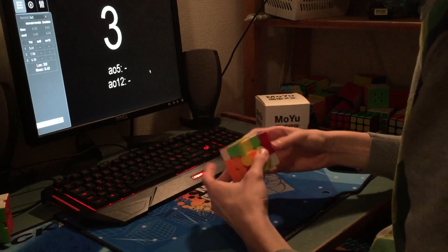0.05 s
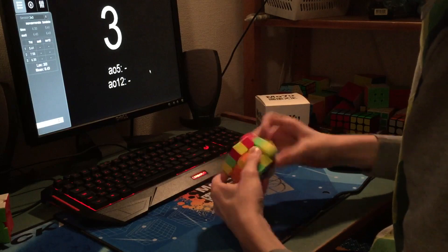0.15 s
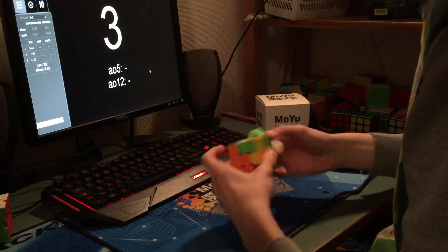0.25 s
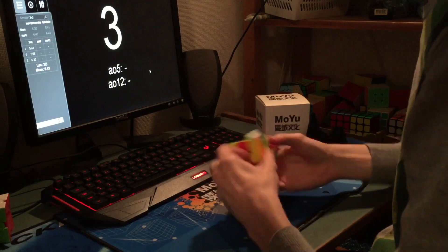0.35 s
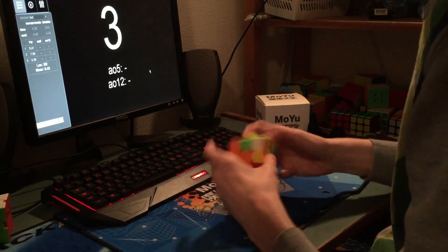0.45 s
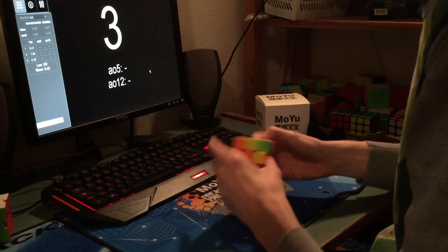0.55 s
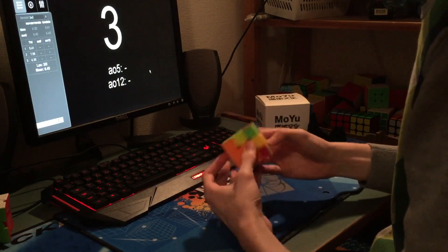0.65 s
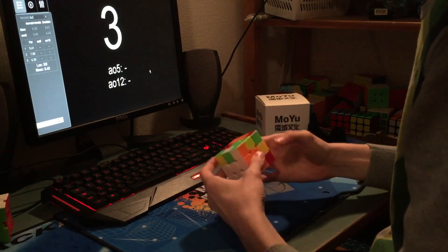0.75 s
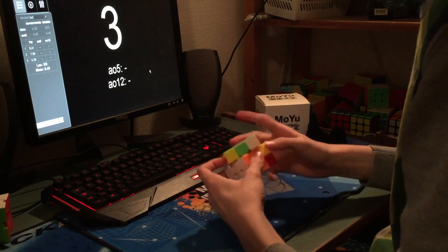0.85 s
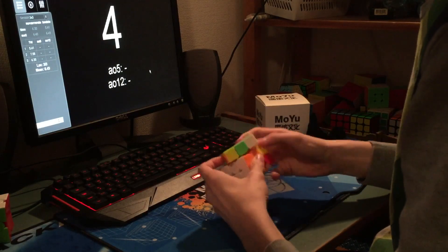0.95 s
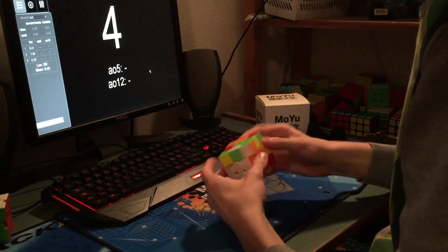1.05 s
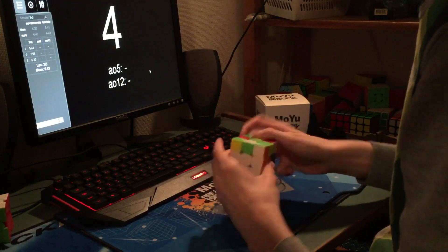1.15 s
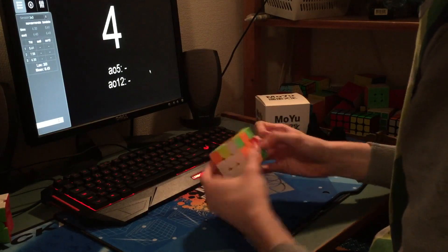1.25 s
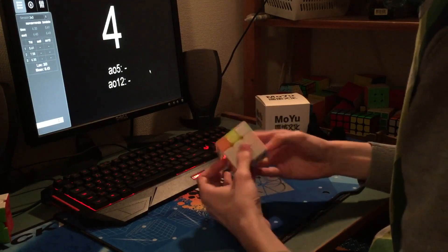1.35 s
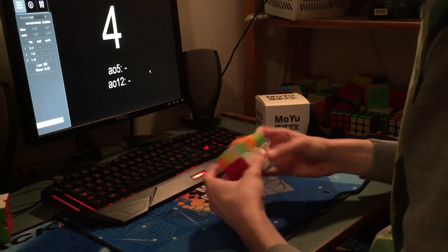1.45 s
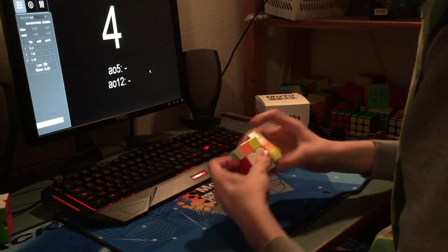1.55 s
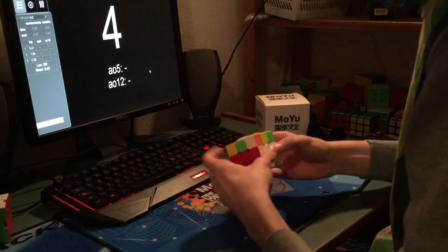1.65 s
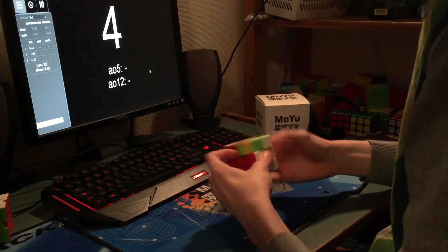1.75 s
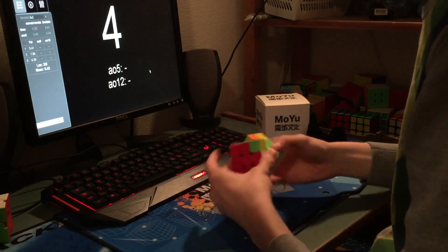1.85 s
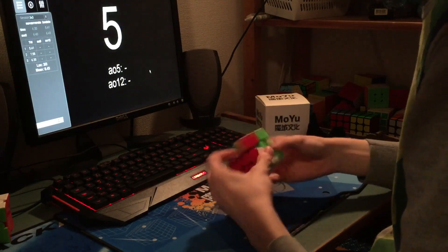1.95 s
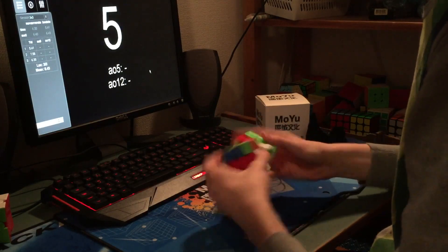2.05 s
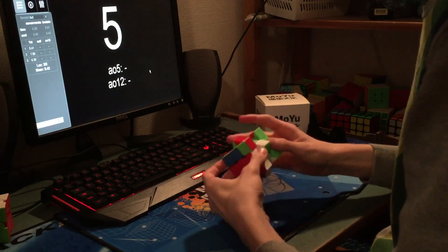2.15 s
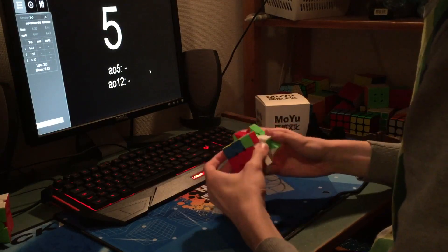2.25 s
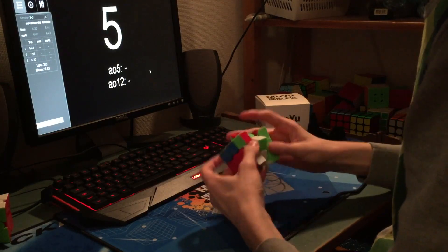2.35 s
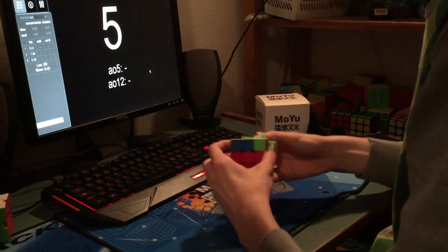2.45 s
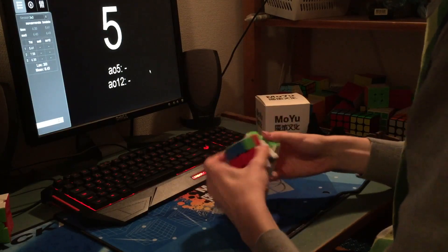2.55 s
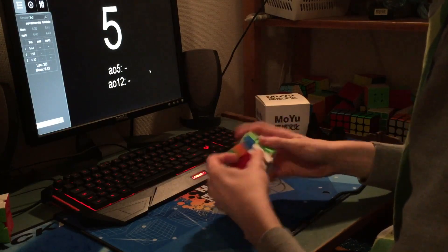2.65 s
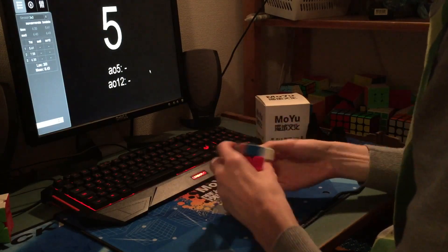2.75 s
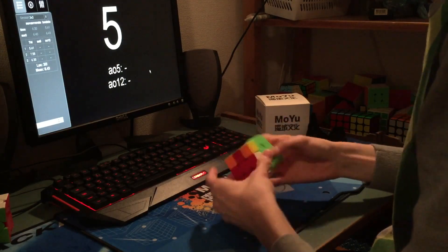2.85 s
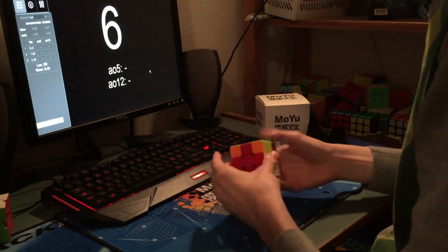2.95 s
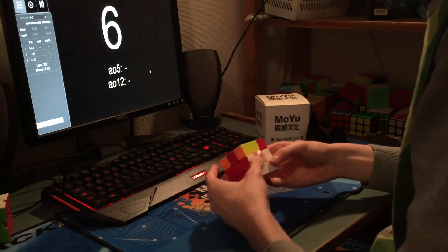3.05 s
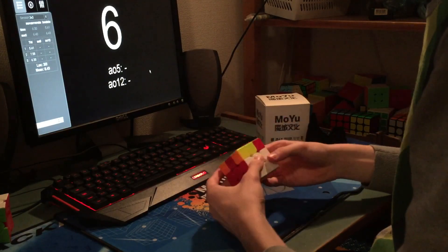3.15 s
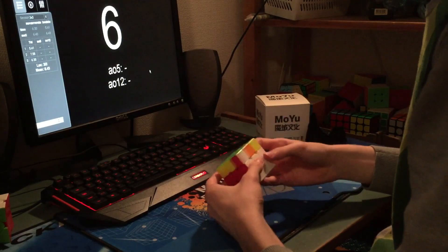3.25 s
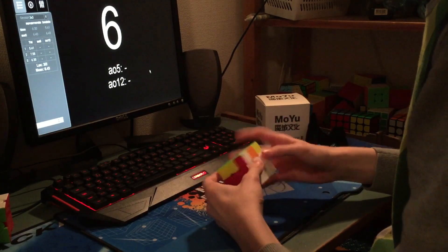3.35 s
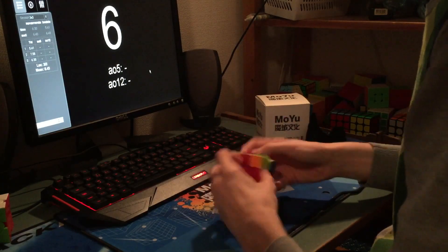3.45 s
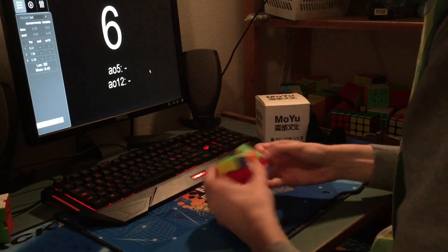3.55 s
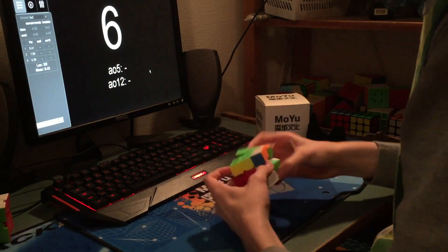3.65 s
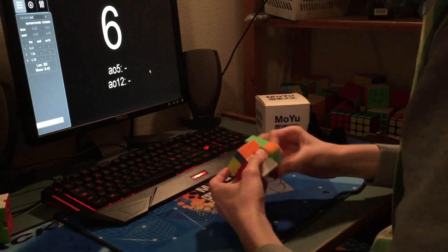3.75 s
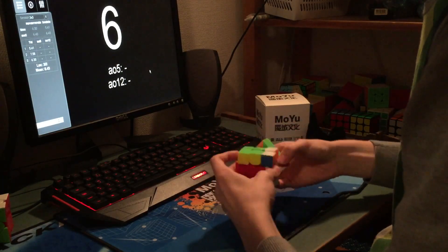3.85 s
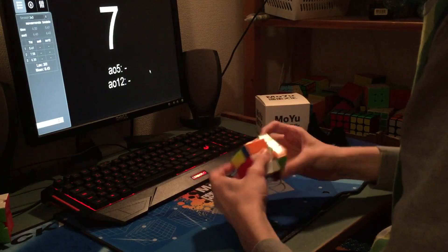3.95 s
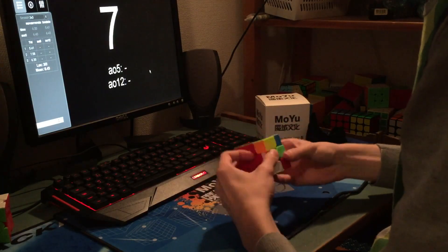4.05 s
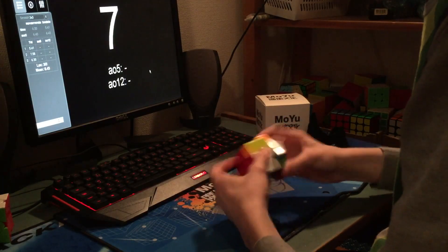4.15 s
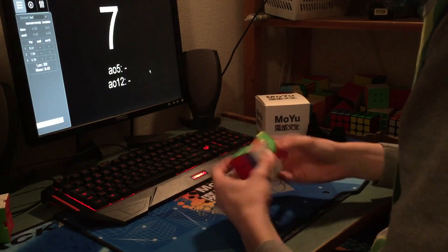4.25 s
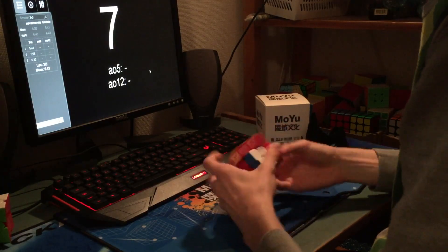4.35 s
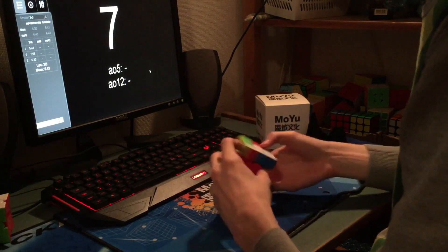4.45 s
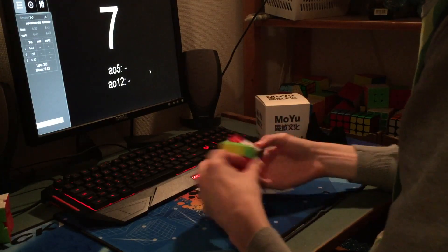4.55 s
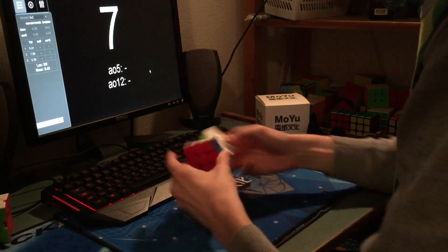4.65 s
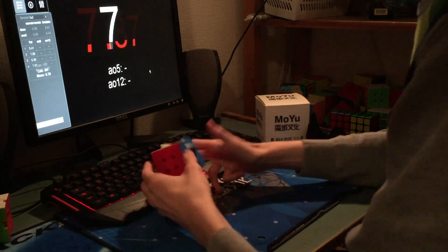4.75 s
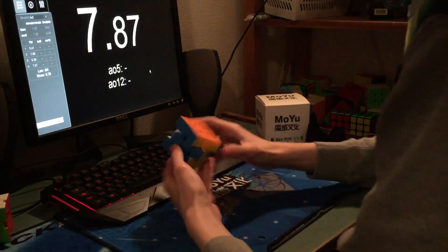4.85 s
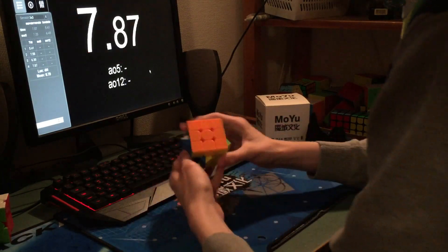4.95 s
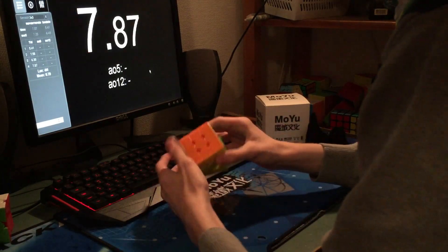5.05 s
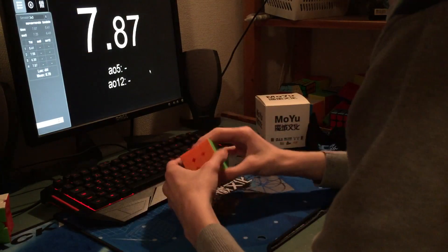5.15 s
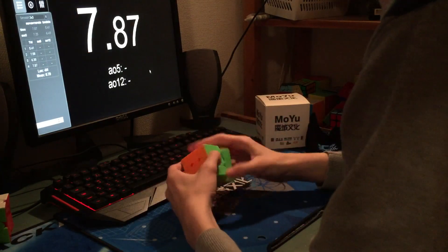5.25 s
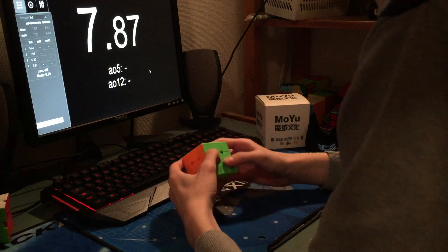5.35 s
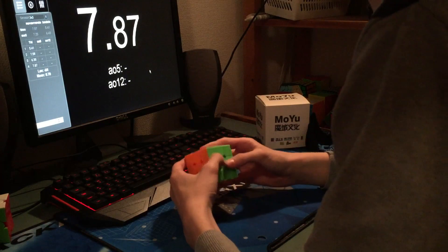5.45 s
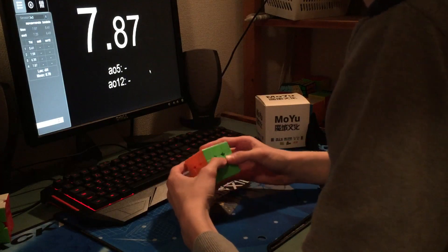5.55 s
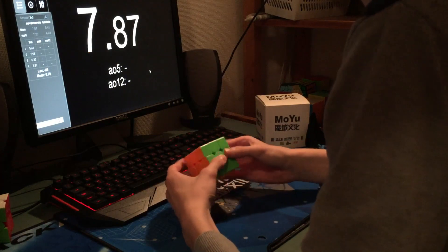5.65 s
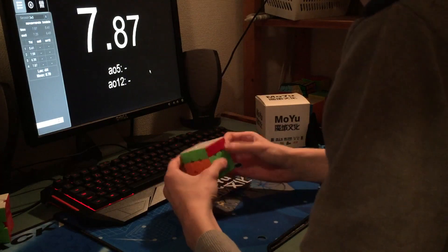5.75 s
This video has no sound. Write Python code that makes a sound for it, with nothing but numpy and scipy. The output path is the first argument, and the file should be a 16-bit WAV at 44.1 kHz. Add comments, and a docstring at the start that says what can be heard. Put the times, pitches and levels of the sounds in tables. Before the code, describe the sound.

Rapid plastic clicking and clacking of a puzzle cube being turned, ending in a key slap and low thud over faint hum.

```python
"""Sharp plastic clicks and a fine rattle: hands spin a puzzle cube above a desk. Its layers slide by
stick-slip friction and snap home, and each impact rings the damped modes of the pieces and hollow body.
Then a hand slaps the space bar: the key knocks and the desk booms in its low modes.
A computer fan hums over a steady hiss, and the small room adds short echoes to the impacts."""
import sys
import numpy as np
from scipy import signal
from scipy.fft import rfft, irfft
from scipy.io import wavfile

SR = 44100
rng = np.random.default_rng(int(sys.argv[2]) if len(sys.argv) > 2 else 0)


def generate_wav(signal):
    """Clip the signal to [-1, 1] and save it as 16-bit WAV at the path in sys.argv[1]."""
    frames = np.transpose(np.atleast_2d(signal))
    scaled = np.clip(frames, -1, 1) * 32767
    pcm = np.round(scaled).astype(np.int16)
    wavfile.write(sys.argv[1], SR, pcm)


N = 255780

# pieces snapping against each other: (time [s], level [dB], hollow body over bright pieces [dB])
SNAPS = [(0.0046, -15.5, 0), (0.092, -32.5, -13), (0.1155, -35, -3), (0.2023, -38.5, 13.5),
         (0.2088, -21.5, -3), (0.2266, -11, -9), (0.2598, -31, -4.5), (0.2906, -14.5, -6),
         (0.3028, -17.5, -1), (0.354, -21.5, -8), (0.365, -33.5, 4), (0.3806, -29, -24.5),
         (0.4042, -33.5, 8), (0.4536, -25.5, 6), (0.4634, -14, -2.5), (0.494, -26, -0.8),
         (0.504, -11.5, 2.5), (0.5327, -14.5, 2), (0.5556, -7.5, -21.5), (0.6425, -23, 2.6),
         (0.6833, -24.5, 2.5), (0.6901, -25, -0.5), (0.8093, -52, -7), (0.8475, -43.5, -30),
         (0.9005, -52, -18), (0.9573, -35.5, 0), (0.979, -33, -2), (1.0423, -32, -16), (1.0872, -28, -5),
         (1.1033, -20, 0), (1.2032, -38, -11), (1.2188, -35, 6.5), (1.2501, -35, 10), (1.2598, -30, -4),
         (1.3315, -32.5, 6), (1.3379, -16.5, -3.5), (1.3503, -22.5, 0.5), (1.3597, -15.5, -3),
         (1.383, -8.5, -4.2), (1.492, -37, -20.5), (1.5612, -25.5, 5), (1.579, -10.5, -13),
         (1.5856, -21.5, 4.5), (1.6589, -14, 0), (1.6679, -9.5, -7), (1.704, -12, -18),
         (1.7532, -19.5, -29), (1.8156, -31, -12), (1.8458, -32.5, 7.5), (1.8594, -21, -1),
         (1.8674, -16, -3.5), (1.8908, -29, -18), (1.945, -31.5, -9), (2.0059, -22, 3.5), (2.0316, -22, -2),
         (2.067, -24, 3.5), (2.096, -11, -1), (2.1015, -16, -31), (2.3105, -44.5, 9.5), (2.3229, -32, 2.5),
         (2.3375, -36, -19), (2.3672, -49, -16), (2.4156, -37, -15), (2.4228, -32, 4.5), (2.4443, -29, 0),
         (2.4524, -28.5, 4.5), (2.515, -34, 5.5), (2.5234, -33, -11), (2.534, -26.5, 0), (2.5535, -25.5, 3),
         (2.6548, -33.5, 3.5), (2.6793, -36, -4), (2.693, -31, -1), (2.742, -10.5, -7.5),
         (2.7565, -12.5, -0.5), (2.7967, -26, 8.5), (2.8672, -22, -1.5), (2.9002, -21.5, 6),
         (2.912, -19.5, -3), (2.9638, -5.5, -12), (2.9896, -9.5, -16.5), (3.0324, -22.5, -0.7),
         (3.11, -41.5, -13), (3.1986, -50, -3), (3.2484, -56, -12), (3.349, -46, 6), (3.3573, -33.5, 1.5),
         (3.3713, -31.5, 5), (3.4768, -41, 2.5), (3.489, -35.5, 5.5), (3.499, -18.5, 0), (3.506, -13, -4.5),
         (3.5296, -12, -5), (3.5923, -28, 0), (3.6493, -36, 8.5), (3.6584, -35.5, 6), (3.694, -16.5, -0.1),
         (3.7073, -11.5, -10), (3.7288, -25.5, 5.5), (3.758, -22.5, -18.5), (3.7962, -28, -5.5),
         (3.8187, -18, -7.5), (3.8267, -21, -8), (3.8418, -9.5, 2), (3.887, -29.5, 1), (3.9151, -9, -6.5),
         (3.9928, -30, 1), (4.0134, -29.5, -21), (4.0257, -10, -5.5), (4.0469, -14.5, 3),
         (4.079, -17, -4.5), (4.122, -24, 5), (4.1315, -22, 1), (4.1521, -5.5, -12), (4.1649, -14.5, 1),
         (4.2513, -35.5, -8), (4.2606, -9, -1.8), (4.268, -19, 7), (4.3049, -11.5, -19.5),
         (4.3471, -12, 1.5), (4.3536, -18, 0.5), (4.3717, -11.5, -12), (4.3847, -15.5, -1.5),
         (4.4041, -24, -3.5), (4.4153, -5, -7), (4.563, -29.5, -1), (4.579, -27.5, -6), (4.5956, -23, 1.5),
         (4.613, -23.5, 4), (4.6767, -19, 3), (4.6914, -19.5, 5), (4.7476, -23, 2.5), (4.7748, -11.5, -4),
         (5.0433, -34, -18), (5.0606, -20.5, -3.5), (5.2847, -57, -8), (5.3829, -59, -4),
         (5.432, -49.5, -1), (5.5479, -55, -15)]
# a layer sliding: (time of top speed [s], level [dB], time to fade by 5 dB [ms])
SLIDES = [(0.008, -24.5, 13.5), (0.21, -23, 2.5), (0.243, -29.5, 20), (0.303, -28.5, 18.5),
          (0.358, -31.5, 23.5), (0.392, -31.5, 6.5), (0.447, -26.5, 3), (0.476, -34.5, 17.5),
          (0.519, -20, 11.5), (0.58, -27, 23.5), (0.641, -32, 13), (0.718, -40.5, 17), (0.969, -43.5, 10.5),
          (1.045, -45, 1), (1.114, -46, 13), (1.219, -39, 5.5), (1.266, -36, 19.5), (1.352, -31.5, 11.5),
          (1.377, -29.5, 19), (1.603, -23, 20.5), (1.67, -30.5, 19), (1.71, -29, 17), (1.855, -43, 18),
          (1.975, -31, 8), (2.032, -44, 9), (2.078, -24.5, 8), (2.123, -16, 18), (2.205, -30.5, 13),
          (2.42, -36.5, 12), (2.559, -32, 27), (2.65, -41, 10.5), (2.696, -37.5, 13.5), (2.757, -28, 18.5),
          (2.8, -30.5, 11.5), (2.844, -28.5, 22), (2.872, -20.5, 3.5), (2.93, -23.5, 32),
          (2.973, -17.5, 12), (3.013, -32.5, 22), (3.37, -40.5, 11), (3.524, -27, 19.5), (3.654, -35, 5.5),
          (3.698, -24, 9.5), (3.766, -28, 6.5), (3.834, -29, 13.5), (3.921, -29, 13.5), (4.052, -30, 31),
          (4.078, -21.5, 8.5), (4.161, -30.5, 10), (4.266, -25.5, 10), (4.322, -28.5, 24.5),
          (4.347, -21, 12), (4.411, -21.5, 7), (4.454, -24, 12), (4.495, -24, 8), (4.616, -35.5, 29.5),
          (4.683, -30.5, 7), (4.716, -23, 20.5), (4.765, -22, 18), (5.086, -60.5, 25)]
# modes of the cube: (frequency [Hz], bandwidth [Hz], level [dB])
BODY_MODES = [(331, 83, -19.5), (512, 750, -28), (850, 960, -27), (1268, 47, -21), (2258, 377, -3),
              (2840, 450, -7), (3626, 400, -6.5)]  # hollow ring of the whole cube
PIECE_MODES = [(3400, 570, -4.5), (4290, 850, -3.5), (5590, 580, -7), (6116, 840, -2.5), (7350, 1460, -3),
               (9200, 1800, -12), (12050, 1800, -7.5), (13200, 1200, -14.5), (15300, 2200, -12)]  # bright ring of single pieces
CORE_MODES = [(1534, 55, -16)]  # the axle cross inside
# fingers and sticker side shift the modes: (frequency factor [ratio])
GRIP_SHIFTS = (.93, .97, 1.0, 1.03, 1.07)
# the hold: (time [s], resonance between palms and cube [Hz], freedom of the core to ring [dB])
HOLD = [(0, 1450, 2.5), (.15, 1310, 14.5), (.3, 1780, 3.5), (.9, 1660, 5), (1.12, 1360, 3),
        (1.3, 1470, 0.5), (1.6, 1660, 1.5), (1.95, 1490, 3), (2.08, 1950, -8), (2.6, 1990, 3),
        (3.05, 1880, -1), (3.5, 1740, 1), (4.5, 1810, 0.5), (4.75, 1780, -10), (5.0, 1277, -9.5),
        (5.8, 1266, -14)]
# the key going down and rattling: (time [s], level [dB], low over high modes [dB])
KEY_KNOCKS = [(4.8332, -31, 7.5), (4.838, -12, -3.5), (4.8425, -22, 18.5), (4.857, -36, 3),
              (4.8668, -37, 4.5), (4.873, -37, 13), (4.891, -37.5, 1), (4.9068, -30, 11.5)]
# modes of the key: (frequency [Hz], bandwidth [Hz], level [dB])
KEY_LOW_MODES = [(442, 78, -10), (670, 870, -9.5), (900, 570, -2), (1210, 190, -3.5), (1540, 350, -2),
                 (2000, 440, -1), (2530, 390, 1)]
KEY_HIGH_MODES = [(3270, 600, 4.5), (3600, 290, 6), (4200, 460, -0.5), (5000, 1000, -15),
                  (5800, 590, -10.5), (8010, 4500, -16.5), (12600, 2700, -4)]
# the slap and the desk settling after it: (time [s], level [dB])
DESK_BLOWS = [(4.845, -3), (4.94, -16), (5.096, -34)]
# modes of the desk: (frequency [Hz], level [dB], time to decay by 60 dB [s])
DESK_MODES = [(62, -29, 0.24), (97, -30, 0.29), (120.4, -29, 0.37), (159.1, -39, 0.5), (183, -36, 0.5),
              (211.5, -34, 0.37), (245.5, -35, 0.17), (332.3, -30, 0.14), (410, -34.5, 0.22)]
# tones of the fan: (frequency [Hz], bandwidth [Hz], level [dB])
FAN_TONES = [(122.7, 2, -72), (160.7, 8, -71.5), (192, 29, -76), (290, 6, -85)]
# spectrum of the hiss and rumble: (frequency [Hz], relative density [dB])
AIR_SPECTRUM = [(18, -44.5), (30, -5), (128, 0), (388, -6.5), (443, -8), (547, -9.5), (881, -13.5),
                (2160, -15), (4900, -25.5), (7280, -32), (10500, -35), (15200, -36), (16500, -49.5)]
# reflections from desk, screen and shelf within the first 9 ms: (level [dB])
ECHO_DB = (-10, -12, -13, -14, -15)
# reverberation of the room: (frequency [Hz], time to decay by 60 dB [s])
ROOM_DECAY = [(150, 0.27), (800, 0.22), (1400, 0.36), (2300, 0.3), (3500, 0.22), (6000, 0.21),
              (12000, 0.21)]
# response of the microphone: (frequency [Hz], gain [dB])
MIC_RESPONSE = [(3000, -1), (9000, 12.5), (10300, 3.5), (11300, 8.5), (15600, 6.5), (16300, -20)]


def cube():
    """Modal vibration: impacts ring the cube, and each new grip shifts its modes and echo paths."""
    s, bright_db, hollow_db = np.hstack([snaps(), slips()])
    grips = rng.integers(0, len(GRIP_SHIFTS), 400)
    grip = grips[(np.maximum(s, 0) * 60).astype(int)]  # 60 grips a second
    hold_s, _, free_db = np.transpose(HOLD)
    out = np.zeros(N)
    for k, shift in enumerate(GRIP_SHIFTS):
        at, bright, hollow = s[grip == k], bright_db[grip == k], hollow_db[grip == k]
        core_db = hollow + np.interp(at, hold_s, free_db)
        sound = strike(at, bright, PIECE_MODES, spread_db=2, scatter_ms=.45, shift=shift)
        sound += strike(at, hollow, BODY_MODES, spread_db=1.5, scatter_ms=1.2, shift=shift)
        sound += strike(at, core_db, CORE_MODES, spread_db=3.5, scatter_ms=1.2)
        sound += palm_cavity(at, hollow - 4.5, width_hz=320)
        out += room(radiated(sound, cutoff_hz=708), wet_db=-4.5)
    return out


def snaps():
    """Impact excitation: each snap is one main blow among three lighter ones as neighbours seat."""
    s, level_db, hollow_db = np.repeat(SNAPS, 4, axis=0).T
    lighter = np.arange(len(s)) % 4 > 0
    scatter_s = 0.0009
    s = s + lighter * scatter_s * (.3 + rng.standard_normal(len(s)))
    level_db = level_db + lighter * rng.uniform(-10.5, -3.5, len(s))
    return np.array([s, level_db - 7.5, level_db + hollow_db - 5])  # (time [s], bright [dB], hollow [dB])


def slips():
    """Stick-slip friction: sliding faces catch and release in tiny blows that grow with speed."""
    top_s, level_db, fade_ms = np.transpose(SLIDES)
    s = rng.uniform(0, N / SR, 7000)
    from_top_ms = (s[:, None] - top_s) * 1000
    span_ms = np.where(from_top_ms < 0, 1.06, 1) * np.maximum(fade_ms, 1)  # the rise is a little slower
    power = gain_of(2 * (level_db - 5 * (from_top_ms / span_ms) ** 2))
    excess_db = 3.5 * np.minimum(rng.exponential(1, len(s)), 4.4)  # a few slips are much stronger
    slip_db = 10 * np.log10(power.sum(1) + 1e-20) + excess_db
    return np.array([s, slip_db - 14, slip_db - 13.5])  # (time [s], bright [dB], hollow [dB])


def palm_cavity(s, level_db, width_hz):
    """Cavity resonance: the air between palms and cube has one broad mode that follows the hold."""
    hold_s, hz, _ = np.transpose(HOLD)
    phasor = np.exp(2j * np.pi * np.cumsum(np.interp(np.arange(N) / SR, hold_s, hz)) / SR)
    blows = impulses(s, rng.choice([-1., 1.], len(s)) * gain_of(level_db))
    decay = np.exp(-np.pi * width_hz / SR)
    return (phasor * signal.lfilter([1], [1, -decay], blows / phasor)).imag


def blip(start_s=3.401, from_hz=860, to_hz=455, glide_s=0.015, rise_s=0.006, fade_db_per_s=599):
    """Damped glide: a soft tone falls and dies, perhaps a fingertip slipping on plastic."""
    t = np.maximum(np.arange(N) / SR - start_s, 0)
    hz = to_hz + (from_hz - to_hz) * np.cos(np.pi / 2 * np.minimum(t / glide_s, 1)) ** 2
    envelope = np.minimum(t / rise_s, 1) ** 2 * gain_of(-44.5 - fade_db_per_s * t)
    return envelope * np.sin(2 * np.pi * np.cumsum(hz) / SR)


def space_bar():
    """Impact excitation: the key goes down and rattles, and each knock rings its high and low modes."""
    s, level_db, low_db = np.transpose(KEY_KNOCKS)
    key = strike(s, level_db - 7, KEY_HIGH_MODES, spread_db=1.5, scatter_ms=.8)
    key += strike(s, level_db + low_db - 7, KEY_LOW_MODES, spread_db=1.5, scatter_ms=1.5)
    return room(radiated(key, cutoff_hz=416), wet_db=-3.5)


def desk(swell_s=0.0077):
    """Free vibration: each blow swells into the low modes of the desk, which decay exponentially."""
    out = np.zeros(N)
    for blow_s, blow_db in DESK_BLOWS:
        t = np.maximum(np.arange(N) / SR - blow_s, 0)
        boom = sum(gain_of(db - 60 * t / t60) * np.sin(2 * np.pi * (hz * t + rng.random()))
                   for hz, db, t60 in DESK_MODES)
        out += gain_of(blow_db) * boom * (1 - np.exp(-(t / swell_s) ** 2))
    return out


def fan():
    """Interference: each tone of the fan wavers as a steady sine beats with narrow-band noise."""
    out = np.zeros(N)
    for hz, width_hz, db in FAN_TONES:
        noise = resonator(rng.standard_normal(N), hz, width_hz)
        tone = 0.0091 * SR / width_hz * np.sin(2 * np.pi * hz * np.arange(N) / SR)
        out += gain_of(db) * unit_rms(noise + tone)
    return out


def air():
    """Spectral shaping: filtered white noise gives a steady hiss and rumble."""
    hz = np.fft.rfftfreq(N, 1 / SR)
    hiss = irfft(rfft(rng.standard_normal(N)) * gain_of(curve_at(AIR_SPECTRUM, hz)), N)
    return gain_of(-67.5) * unit_rms(hiss)


def room(x, wet_db):
    """Reverberation: a few early echoes, then sparse reflections, each band dying at its own rate."""
    taps = np.zeros(SR // 2)
    at = np.arange(180, len(taps) - 20, 20)
    taps[at + rng.integers(0, 20, len(at))] = rng.choice([-1., 1.], len(at))
    hz, t, spectrum = signal.stft(taps, SR, nperseg=256)
    decay = gain_of(-60 * t / curve_at(ROOM_DECAY, hz)[:, None])
    response = signal.istft(spectrum * decay, SR, nperseg=256)[1]
    response *= gain_of(wet_db) / np.linalg.norm(response)
    response[0] = 1  # direct sound
    response[rng.integers(40, 400, len(ECHO_DB))] += gain_of(ECHO_DB)
    return signal.oaconvolve(x, response)[:N]


def strike(s, level_db, modes, spread_db, scatter_ms, shift=1):
    """Modal superposition: each blow lands on another spot, so it weights and delays the modes anew."""
    share = rng.standard_normal((len(s), len(modes)))
    delay_s = rng.random(share.shape) * scatter_ms / 1000
    out = np.zeros(N)
    for k, (hz, width_hz, db) in enumerate(modes):
        strength = np.sign(share[:, k - 1]) * gain_of(level_db + db + spread_db * share[:, k])
        out += resonator(impulses(s + delay_s[:, k], strength), hz * shift, width_hz)
    return out


def impulses(s, strength):
    """Impulse train: each brief blow acts within one sample."""
    return np.bincount(np.clip((s * SR).astype(int), 0, N - 1), strength, N)


def resonator(x, hz, width_hz):
    """Damped harmonic oscillator: a unit blow starts a decaying sine of height 1."""
    decay, angle = np.exp(-np.pi * width_hz / SR), 2 * np.pi * hz / SR
    return signal.lfilter([0, decay * np.sin(angle)], [1, -2 * decay * np.cos(angle), decay ** 2], x)


def radiated(x, cutoff_hz):
    """Radiation efficiency: a small body pushes little air at low frequency."""
    return signal.sosfilt(signal.butter(3, cutoff_hz, "high", fs=SR, output="sos"), x)


def gain_of(db):
    """Amplitude ratio of a level in decibels."""
    return 10 ** (np.asarray(db) / 20)


def unit_rms(x):
    """Normalisation to an rms of 1."""
    return x / np.sqrt(np.mean(x ** 2) + 1e-20)


def curve_at(points, hz):
    """Linear interpolation on a log-frequency axis."""
    point_hz, value = np.transpose(points)
    return np.interp(np.log(hz + 1), np.log(point_hz + 1), value)


def scene():
    """Superposition: the pressures of all sources add at one microphone."""
    return (cube() + blip() + space_bar() + desk() + air() + fan())[None]


def record(dry):
    """Linear filtering: a bass cut, microphone colour with a notch from its housing, and a band limit."""
    hz = np.linspace(0, SR / 2, 257)
    bass_cut = signal.butter(3, 48, "high", fs=SR, output="sos")
    colour = signal.firwin2(255, hz, gain_of(curve_at(MIC_RESPONSE, hz)), fs=SR)
    band_limit = signal.firwin(511, cutoff=16800, window=("kaiser", 9), fs=SR)
    coloured = signal.oaconvolve(signal.sosfilt(bass_cut, dry), colour[None], "same")
    return signal.oaconvolve(coloured, band_limit[None], "same")


dry = scene()
out = record(dry)
generate_wav(out)
```